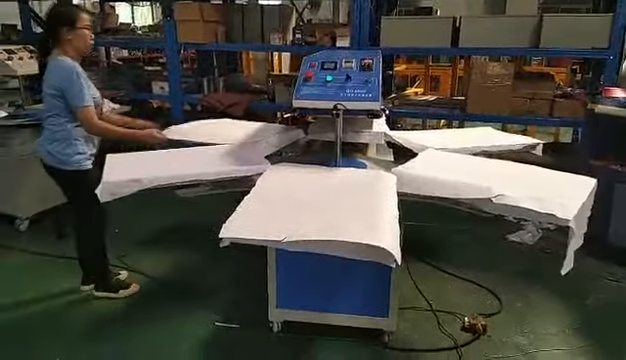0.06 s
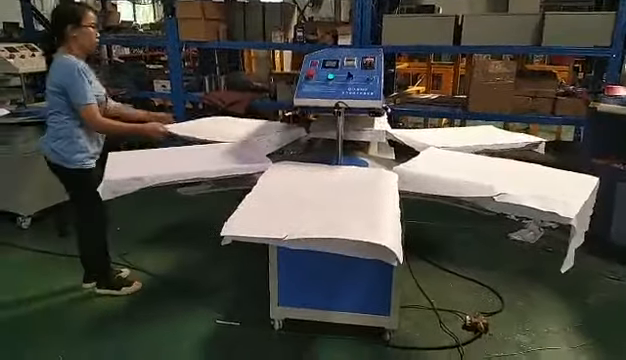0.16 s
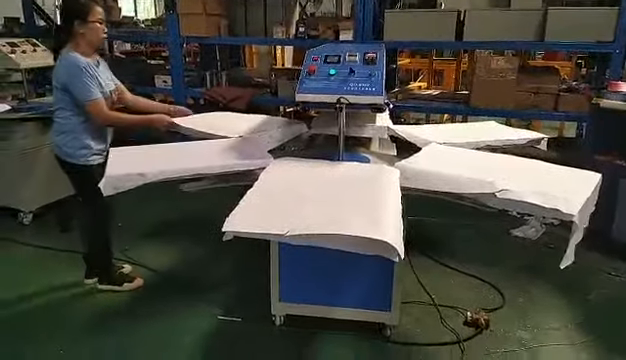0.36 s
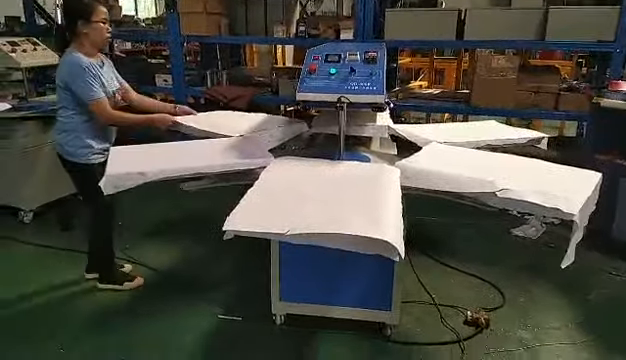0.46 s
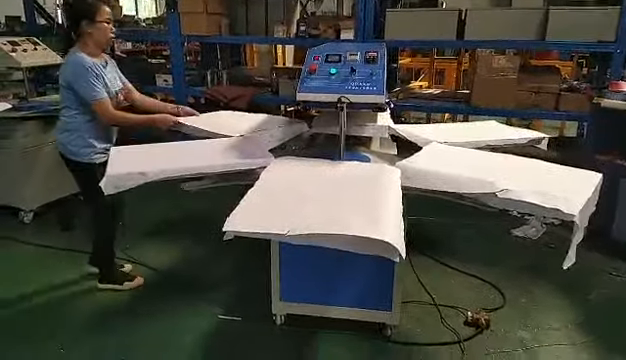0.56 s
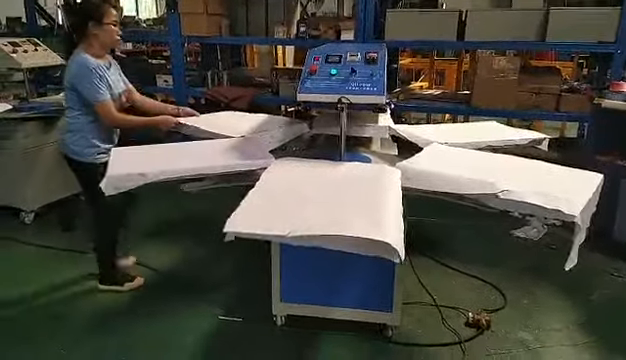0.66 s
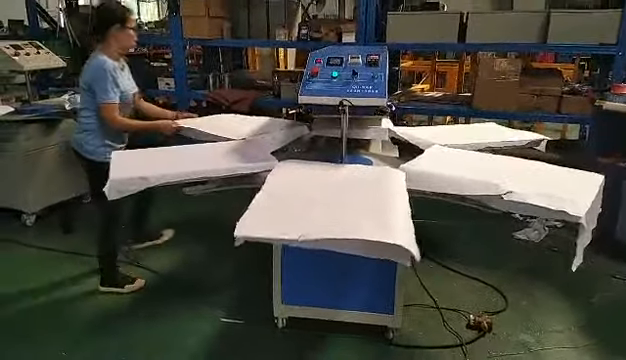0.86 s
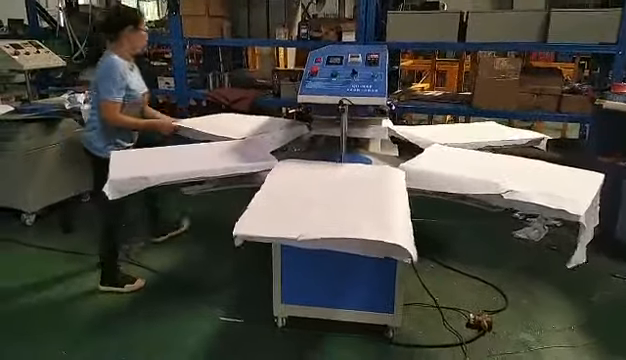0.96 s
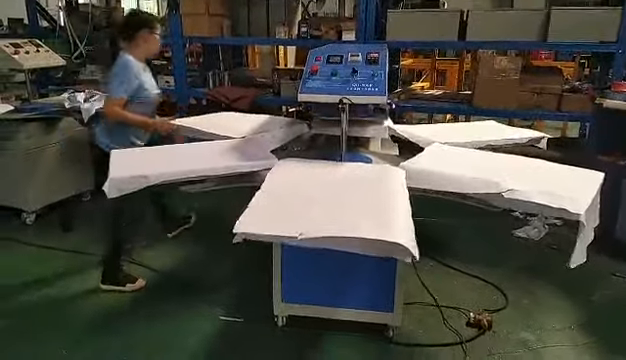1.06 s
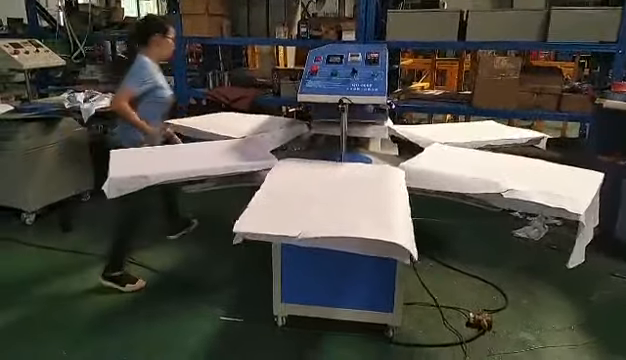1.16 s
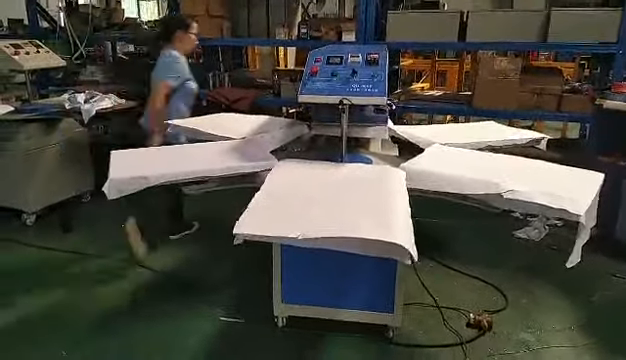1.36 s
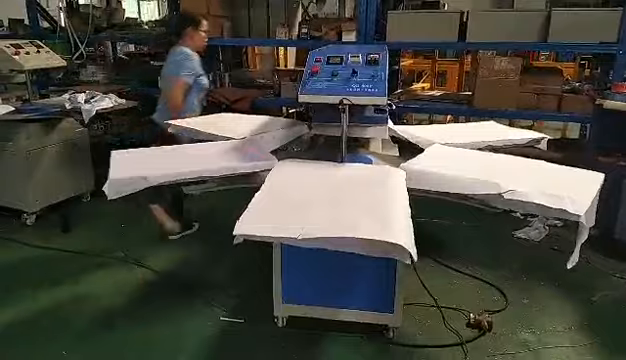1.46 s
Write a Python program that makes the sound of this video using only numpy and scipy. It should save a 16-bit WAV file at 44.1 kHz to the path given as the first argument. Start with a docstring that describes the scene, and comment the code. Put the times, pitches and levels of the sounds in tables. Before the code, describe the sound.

One stroke of an air-driven press: a valve pop starts a strong hiss, the ram thumps, the platen clanks, and the frame knocks and rattles over faint workshop murmur, picked up in stereo with dulled top end.

```python
"""Pneumatic heat press, one stroke

A valve pops and air hisses out: shaped noise with outlet peaks and slow ripples, turning thinner.
The ram thumps and the platen clanks, each as decaying sine modes over a burst of noise.
The frame knocks and rattles, loose parts tick and a carousel rolls softly over a low workshop murmur.
The blows, the pop and its puff, and the frame also feed a diffuse noise reverberation."""
import sys
import numpy as np
from scipy import signal
from scipy.fft import rfft, irfft
from scipy.io import wavfile
from scipy.ndimage import map_coordinates

SR = 44100
rng = np.random.default_rng(int(sys.argv[2]) if len(sys.argv) > 2 else 0)


def bounce(signal):
    """Save signal as a 16-bit WAV file at the path given by the first command-line argument."""
    frames = np.transpose(np.atleast_2d(signal))
    limited = np.clip(frames, -1, 1)
    pcm = np.round(limited * 32767).astype(np.int16)
    wavfile.write(sys.argv[1], SR, pcm)


N = 66150
T = np.arange(N) / SR
HZ = np.fft.rfftfreq(N, 1 / SR)

# Noise colours are relative: each noise is scaled to an rms of one before its level is set.
# Murmur of the workshop. Each row: frequency in Hz, density in dB per Hz.
MURMUR_COLOUR = [(25,-19.5),(50,-7),(72,1),(110,-1),(200,-5),(320,-5),(500,-10.5),(1000,-12.5),(1500,-16),(2000,-15.5),(4000,-18),(7500,-28)]
MURMUR_DB = -55
# Left-right likeness of diffuse sound. Each row: frequency in Hz, likeness from 0 to 1.
LIKENESS = [(50,1),(300,.96),(600,0.73),(1200,0.23),(2500,0.21),(7000,.1)]
# Reverberation of the workshop. Each row: frequency in Hz, time to fall 60 dB in seconds.
ROOM_T60 = [(100,0.73),(400,0.52),(1500,0.53),(7000,0.36)]

# Rolling of the carousel. Each row: frequency in Hz, density in dB per Hz.
ROLL_COLOUR = [(60,-17),(130,-11.5),(200,6.5),(330,0),(500,-10.5),(1200,-8),(2500,-28)]
ROLL_FROM_S, ROLL_RISE_S, ROLL_DB = 1.03, 0.16, -59

# Last of an earlier air release. Each row: frequency in Hz, density in dB per Hz.
LEAK_COLOUR = [(4000,-40),(4600,-25.5),(4900,-8),(5200,-26),(5650,-6),(5950,-0.5),(6400,-8.5),(7500,-13)]
LEAK_DB, LEAK_HOLD_S, LEAK_FALL_DB_PER_S = -42.5, 0.049, 148

# Ticks of loose parts. Each row: start in seconds, centre frequency in Hz, level in dB.
LOOSE_TICKS = [(0.761,960,-37),(.8,2000,-50.5),(0.824,693,-46),(0.835,2235,-46.5),(.872,1570,-53),(0.961,1152,-52.5),(1.032,2030,-64),(1.273,1920,-58.5)]
TICK_HALF_WIDTH_HZ, TICK_T60_S = 57, 0.11  # 6 dB down at the half-width

# Air flow through the valve. Each row: time in seconds, level in dB before the make-up gain.
AIR_FLOW = [(0.212, -70), (0.218, -48), (0.246, -29.5), (0.264, -24.5), (0.38, -28), (0.394, -25),
            (0.53, -28), (0.552, -26), (0.574, -25.5), (0.82, -31.5), (0.856, -33.5), (0.996, -30),
            (1.316, -33), (1.5, -39.5)]
FLOW_MAKEUP_DB = 2.88
# Hiss at full pressure. Each row: frequency in Hz, density in dB per Hz.
FULL_HISS_COLOUR = [(760, -102), (1300, -59), (1370, -53), (1660, -18), (1960, -20), (2420, -3.5),
                    (3040, -2.5), (3450, -5.5), (3740, -3), (4200, -6), (4300, -4), (5590, -4),
                    (7500, -3.5), (9750, -39), (16500, -120)]
# Thinner hiss once the cylinder has filled. Each row: frequency in Hz, density in dB per Hz.
THIN_HISS_COLOUR = [(1200,-57),(2000,-38.5),(2380,-30),(2500,-10.5),(2680,-18.5),(2880,-6),(3180,2),(3450,-0.5),(3720,-1),(4270,0),(4610,0),(5500,-0.5),(7180,1.5),(7500,-6.5)]
THIN_FROM_S, THIN_TO_S = 0.68, 0.92
# Peaks and dips of the outlet. Each row: centre in Hz, nominal width in Hz, lift in dB.
OUTLET_PEAKS = [(2350,190,-2),(2607,97,-22),(2930,460,-0.5),(3393,130,-13),(3743,130,10),(4072,80,9),(4520,170,3),(4696,130,5.5),(5140,70,5),(5400,180,7.5),(6050,73,3)]
# Faint hum of the air line: centre, half-width, level against the jet before panning
PIPE_HZ, PIPE_HALF_WIDTH_HZ, PIPE_DB = 1130, 43, -34.5
# Ripple that nearby surfaces put on the jet: dB per unit of chance, grid spacing in Hz and seconds
RIPPLE_DB, RIPPLE_SPACING_HZ, RIPPLE_DRIFT_S = 4, 75, 0.2
# Stereo image of the jet: likeness, share and delay of the left reflection, left minus right
HISS_LIKENESS, HISS_ECHO, HISS_LAG_S, HISS_PAN_DB = 0.17, 0.22, 0.001041, 1.36

# Hollow pop of the valve
POP_S, POP_HZ, POP_DB, POP_RISE_S, POP_HOLD_S, POP_T60_S = 0.2305, 375, -25, 0.006, 0.003, 0.05
# Low puff of the valve. Each row: frequency in Hz, density in dB per Hz.
PUFF_COLOUR = [(120, -36), (250, 0.5), (420, 0.5), (600, -20), (1200, -35.5), (2000, -44)]
# Bright spit of air. Each row: frequency in Hz, density in dB per Hz.
SPIT_COLOUR = [(1200, -42), (2100, 8.5), (4000, -1), (7500, 7)]
PUFF_DB, SPIT_DB = -43, -31

# Knocks of the frame. Each row: start in seconds, level in dB, pitch ratio.
FRAME_KNOCKS = [(.59,-24.5,1),(.65,-22.5,0.99),(.685,-29,1.08),(.755,-31.5,.92),(0.794,-35,1.02),(.835,-44.5,.88)]
# Modes each knock excites. Each row: frequency in Hz, dB against the knock, 60 dB decay in seconds.
KNOCK_MODES = [(272.6,-9,0.19),(312.5,5,0.077),(363.6,-3,.11),(410.6,-8,0.11),(496.5,-21,0.24)]
# Rattle of the frame. Each row: frequency in Hz, density in dB per Hz.
RATTLE_COLOUR = [(120,-37),(200,-25.5),(290,-4),(370,-1),(435,-9),(500,-4.5),(600,-4),(700,-4),(790,-10.5),(920,-3.5),(1250,-14),(1650,-16.5),(2200,-10),(2600,-24.5),(3400,-49)]
RATTLE_FROM_S, RATTLE_TO_S, RATTLE_DB = 0.565, 0.735, -25
# The second slope adds to the first after RATTLE_TO_S
RATTLE_FALL_DB_PER_S, RATTLE_STOP_DB_PER_S = 43.5, 184.5

# Light contact starts this long before each blow
TOUCH_LEAD_S = 0.02
# Touch of the ram. Each row: frequency in Hz, density in dB per Hz.
TOUCH_COLOUR = [(500, -31), (900, 6), (1100, 7.5), (1500, -5.5), (2200, -20.5)]
# Modes of the stopping ram. Each row: frequency in Hz, level in dB, 60 dB decay in seconds.
THUMP_MODES = [(74.4,-42.5,0.42),(134.1,-35,0.58),(160,-24,0.13),(259,-35.5,0.45),(391.6,-28,0.56),(597,-36.5,0.27),(895,-28.5,0.15),(1005,-23.5,0.12),(1032,-28.5,0.17),(1148,-30.5,0.21),(1340,-27.5,.15),(1490,-23.5,0.12)]
# Dense clatter of the ram. Each row: frequency in Hz, density in dB per Hz.
CLATTER_COLOUR = [(29, -65.5), (50, -23.5), (156, -4), (270, -18.5), (408, -6), (716, -23), (804, -19.5),
                  (1010, -19.5), (1510, -14), (2600, -16), (3380, -46.5), (5720, -120)]
RAM_S, RAM_RISE_S, RAM_RISE_CYCLES = 0.41, 0.0035, 1.67
TOUCH_DB, CLATTER_DB = -30.5, -25.5

# Modes of the closing platen. Each row: frequency in Hz, level in dB, 60 dB decay in seconds.
CLANK_MODES = [(358,-35.5,0.19),(584.6,-21,0.22),(980,-23.5,0.067),(1019,-19,0.063),(1124,-34,0.062),(1262,-23,0.068),(1380,-22.5,0.17),(1460,-32,.14),(1503,-21,.09),(1848,-23,0.055),(1950,-23,0.18),(2255,-31,0.36)]
# Dense crash of the platen. Each row: frequency in Hz, density in dB per Hz.
CRASH_COLOUR = [(200,-25.5),(400,-6),(750,-15),(1000,-1),(1500,4),(1750,-9.5),(2100,-5),(2600,-12),(3200,-3.5),(4500,-13.5),(7500,-36)]
PLATEN_S, PLATEN_HOLD_S = 0.542, 0.015
CRASH_DB, GRAZE_DB = -20.5, -5.5  # the graze is set against the crash

# Band limits of the pickup
LOW_CUT_HZ, TOP_EDGE_HZ = 42, 7560


def amp(db):
    """Turns decibels into gain."""
    return 10 ** (np.asarray(db) / 20)


def unit(x):
    """Scales to an rms of one."""
    return x / np.sqrt(np.mean(x ** 2) + 1e-20)


def read(points, hz):
    """Reads a table along a log-frequency axis."""
    f, value = np.transpose(points)
    return np.interp(np.log(hz + 1), np.log(np.maximum(f, 1)), value)


def noise(colour_db, same, echo=0):
    """Stereo noise of a given colour and left-right likeness; the left may carry a short echo."""
    right, other = rfft(rng.standard_normal((2, N)))
    shared = np.clip(same, -1, 1) + echo * np.exp(-2j * np.pi * HZ * HISS_LAG_S)
    own = np.sqrt(np.maximum(1 - same ** 2 - echo ** 2, 0))
    left = shared * right + own * other
    return unit(irfft(np.array([left, right]) * amp(colour_db), N))


def peak_db(centre_hz, half_width_hz):
    """Narrow resonance curve, 6 dB down at the half-width."""
    return -20 * np.log10(1 + ((HZ - centre_hz) / half_width_hz) ** 2)


def flutter(rate_hz):
    """Random wander with an rms of one, mostly slower than a given rate."""
    return unit(irfft(rfft(rng.standard_normal(N)) / (1 + (HZ / rate_hz) ** 4), N))


def burst(start, rise, hold, t60):
    """Linear attack, hold and exponential release."""
    attack = np.clip((T - start) / rise, 0, 1)
    return attack * amp(-60 * np.maximum(T - start - rise - hold, 0) / t60)


def ring(start, modes, rise, spread, hold=0):
    """Dying sine modes; the higher ones reach the two sides further out of phase."""
    out = np.zeros((2, N))
    for hz, db, t60 in modes:
        side = rng.choice([-1, 1]) * np.array([[1], [-1]])
        skew = spread * min(hz / 1000, 1.5) ** 2 * side
        wave = np.sin(2 * np.pi * hz * (T - start) + skew)
        out += amp(db) * burst(start, rise, hold, t60) * wave
    return out


def workshop(x, wet_db):
    """Adds a diffuse noise tail whose decay time depends on frequency."""
    # White noise, silent for the first 8 ms
    diffuse = noise(0 * HZ, read(LIKENESS, HZ)) * np.clip((T - 0.008) / 0.0036, 0, 1)
    hz, t, z = signal.stft(diffuse, SR, nperseg=256)
    decay = amp(-60 * t / read(ROOM_T60, hz)[:, None])
    tail = signal.istft(z * decay, SR, nperseg=256)[1][:, :N]
    wet = signal.fftconvolve(x, tail / np.linalg.norm(tail[0]), axes=1)[:, :N]
    return x + amp(wet_db) * wet


def background():
    """Low murmur of distant machines: coloured noise with a slightly wandering level."""
    level_db = MURMUR_DB + 0.51 * flutter(rate_hz=13)
    return noise(read(MURMUR_COLOUR, HZ), read(LIKENESS, HZ)) * amp(level_db)


def carousel():
    """A soft rumble of low noise as the tables are pushed round."""
    swell = np.clip((T - ROLL_FROM_S) / ROLL_RISE_S, 0, 1)
    level_db = ROLL_DB + 1.1 * flutter(rate_hz=53)
    return noise(read(ROLL_COLOUR, HZ), read(LIKENESS, HZ)) * swell * amp(level_db)


def leak():
    """A thin hiss of escaping air that dies away before the stroke."""
    level_db = LEAK_DB - LEAK_FALL_DB_PER_S * np.maximum(T - LEAK_HOLD_S, 0)
    return noise(read(LEAK_COLOUR, HZ), 0.37) * amp(level_db)


def ticks():
    """Faint ticks of loose parts, each a short burst of narrow noise."""
    out = np.zeros((2, N))
    for start, hz, db in LOOSE_TICKS:
        grain = noise(peak_db(hz, TICK_HALF_WIDTH_HZ), 0.6)
        out += amp(db) * burst(start, 0.004, 0.0042, TICK_T60_S) * grain
    return out


def ripple(x):
    """Lays fine, slowly drifting peaks and dips on a sound, different on each side."""
    hz, t, z = signal.stft(x, SR, nperseg=2048)
    at = np.meshgrid(hz / RIPPLE_SPACING_HZ, t / RIPPLE_DRIFT_S, indexing="ij")
    grids = rng.standard_normal(size=(2, 256, 32))
    field = np.array([map_coordinates(grid, at, order=3, mode="mirror") for grid in grids])
    return unit(signal.istft(z * amp(RIPPLE_DB * field), SR, nperseg=2048)[1][:, :N])


def hiss():
    """The air jet sounds through the outlet and loses its lower part as pressure evens out."""
    # Bell-shaped lifts, fallen to 1/e at 0.4 of the nominal width from the centre
    outlet_db = sum(db * np.exp(-((HZ - hz) / (0.4 * width)) ** 2) for hz, width, db in OUTLET_PEAKS)
    full = noise(read(FULL_HISS_COLOUR, HZ) + outlet_db, HISS_LIKENESS, HISS_ECHO)
    late = noise(read(THIN_HISS_COLOUR, HZ) + outlet_db, HISS_LIKENESS, HISS_ECHO)
    pressure = 1 - np.clip((T - THIN_FROM_S) / (THIN_TO_S - THIN_FROM_S), 0, 1)
    # Crossfade at constant power
    jet = ripple(full * pressure + late * np.sqrt(1 - pressure ** 2))
    pipe = amp(PIPE_DB) * noise(peak_db(PIPE_HZ, PIPE_HALF_WIDTH_HZ), 0.3)
    pipe = pipe * amp([[-5], [1]])  # leans right
    level_db = np.interp(T, *np.transpose(AIR_FLOW)) + FLOW_MAKEUP_DB + 0.86 * flutter(rate_hz=48)
    air = (jet + pipe * pressure) * amp(level_db) * (T > 0.214)
    return air * amp(np.array([[0.5], [-0.5]]) * HISS_PAN_DB)


def valve():
    """A spit of air as the valve cracks open, then a hollow pop and puff as the line fills."""
    pop = ring(POP_S, [(POP_HZ, POP_DB, POP_T60_S)], POP_RISE_S, spread=0.3, hold=POP_HOLD_S)
    puff = noise(read(PUFF_COLOUR, HZ), read(LIKENESS, HZ)) * burst(0.214, 0.011, 0.029, 0.58)
    spit = noise(read(SPIT_COLOUR, HZ), 0.3) * burst(0.2135, 0.019, 0.018, 0.077)
    return workshop(pop + amp(PUFF_DB) * puff, wet_db=-28) + amp(SPIT_DB) * spit


def frame():
    """Low modal knocks and an uneven noise rattle as the frame takes the load."""
    knocks = np.zeros((2, N))
    for start, db, ratio in FRAME_KNOCKS:
        modes = [(hz * ratio, mode_db, t60) for hz, mode_db, t60 in KNOCK_MODES]
        knocks += amp(db) * ring(start, modes, rise=0.0075, spread=0.3)
    level_db = RATTLE_DB - RATTLE_FALL_DB_PER_S * (T - RATTLE_FROM_S)
    level_db = level_db - RATTLE_STOP_DB_PER_S * np.maximum(T - RATTLE_TO_S, 0)
    level_db = level_db + 1.3 * flutter(rate_hz=72)
    onset = np.clip((T - RATTLE_FROM_S) / 0.011, 0, 1)
    # Onset goes on last, so nothing rattles before the start
    rattle = noise(read(RATTLE_COLOUR, HZ), read(LIKENESS, HZ)) * amp(level_db) * onset
    return workshop(knocks + rattle, wet_db=-13.5)


def ram():
    """A light touch, then a dull thump of modes with a short noise clatter."""
    touch = noise(read(TOUCH_COLOUR, HZ), 0.34) * burst(RAM_S - TOUCH_LEAD_S, 0.01, 0.0085, 0.055)
    clatter = noise(read(CLATTER_COLOUR, HZ), read(LIKENESS, HZ))
    clatter = clatter * burst(RAM_S + 0.0022, 0.011, 0.032, 0.14)
    thump = np.zeros((2, N))
    for hz, db, t60 in THUMP_MODES:
        rise = RAM_RISE_S + RAM_RISE_CYCLES / hz  # low modes swell more slowly
        thump += ring(RAM_S, [(hz, db, t60)], rise, spread=0.16, hold=0.005)
    return workshop(thump + amp(CLATTER_DB) * clatter + amp(TOUCH_DB) * touch, wet_db=-8)


def platen():
    """A hard metal clank: the platen grazes, seats and rings over a brief dense crash."""
    graze = amp(GRAZE_DB) * burst(PLATEN_S - TOUCH_LEAD_S, 0.026, 0.015, 0.018)
    seat = burst(PLATEN_S, 0.0048, 0.022, 0.082)
    crash = noise(read(CRASH_COLOUR, HZ), read(LIKENESS, HZ)) * (seat + graze)
    # The platen stays pressed for a moment before its ring dies
    clank = ring(PLATEN_S, CLANK_MODES, rise=0.0099, spread=0.19, hold=PLATEN_HOLD_S)
    return workshop(clank + amp(CRASH_DB) * crash, wet_db=-9)


def scene():
    """One stroke of the press over the workshop background."""
    surroundings = background() + carousel() + leak()
    air = hiss() + valve()
    metal = ticks() + frame() + ram() + platen()
    return surroundings + air + metal


def record(dry):
    """The microphone's low cut and a steep upper band limit."""
    low_cut = signal.butter(2, LOW_CUT_HZ, "highpass", fs=SR, output="sos")
    thinned = signal.sosfilt(low_cut, dry)
    band_limit = signal.firwin(1023, TOP_EDGE_HZ, window=("kaiser", 9), fs=SR)
    return signal.oaconvolve(thinned, band_limit[None], "same")


dry = scene()
out = record(dry)
bounce(out)
```